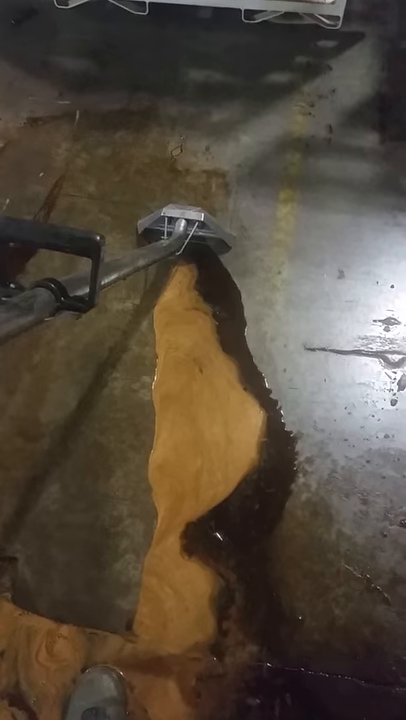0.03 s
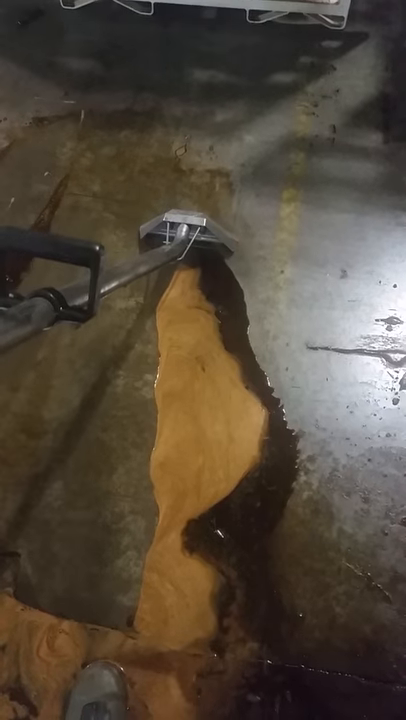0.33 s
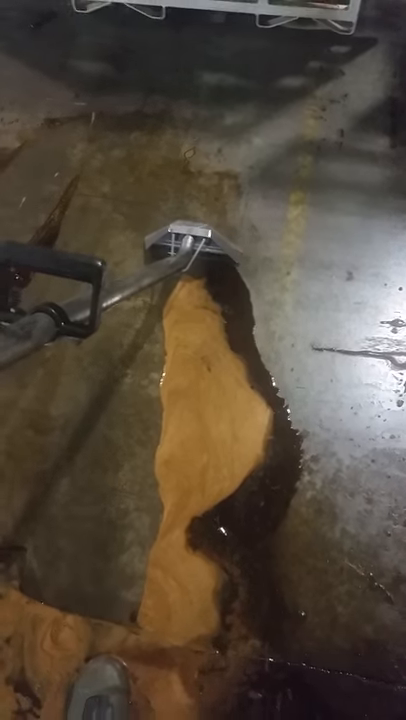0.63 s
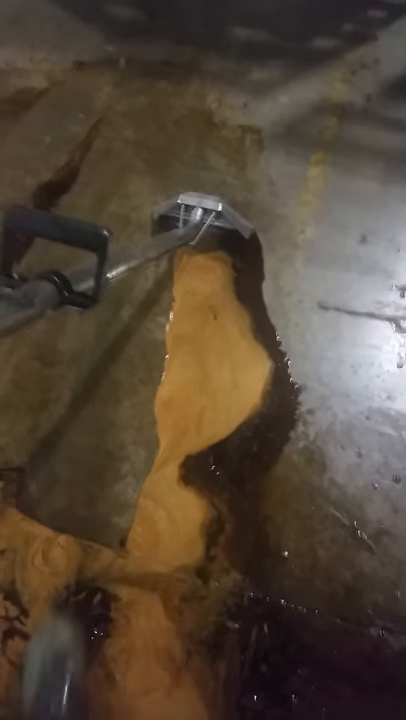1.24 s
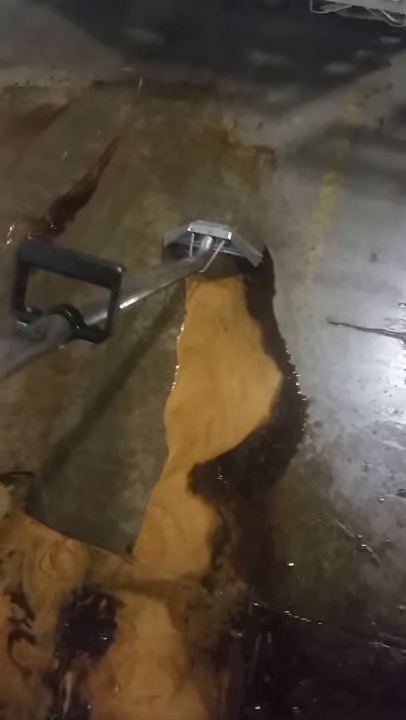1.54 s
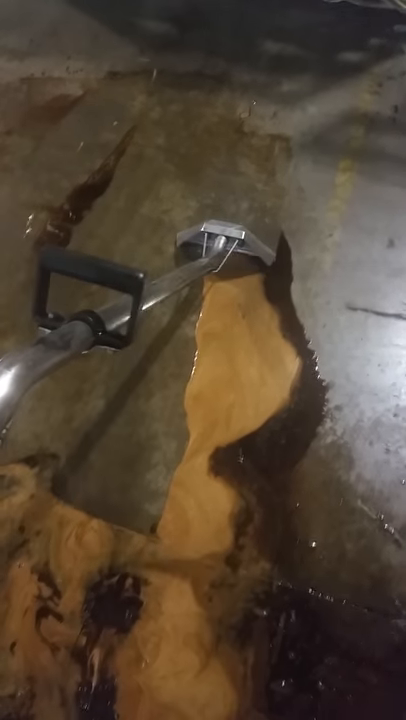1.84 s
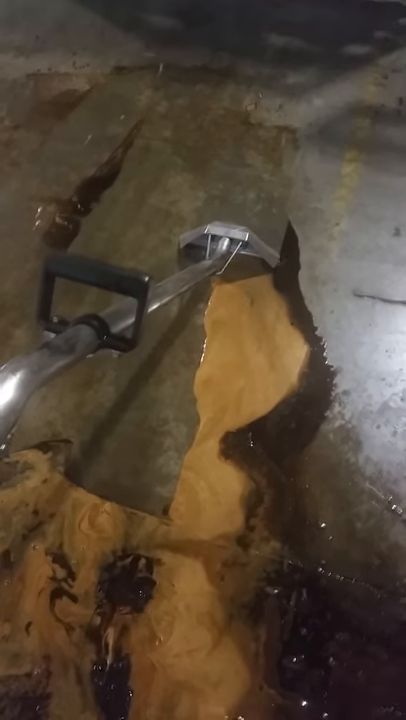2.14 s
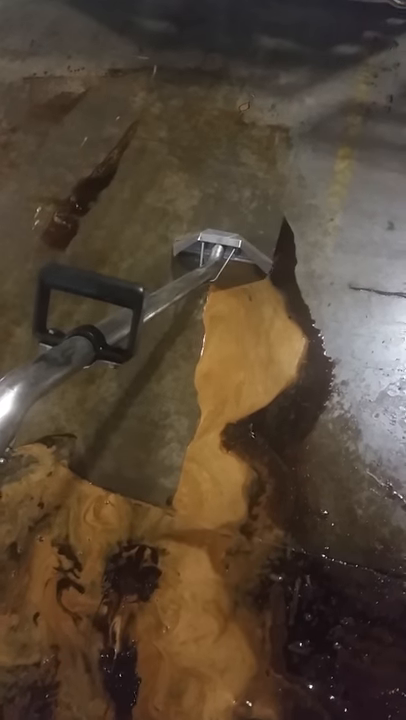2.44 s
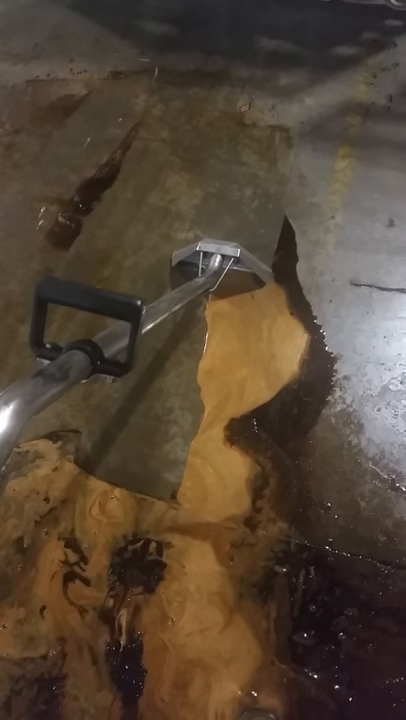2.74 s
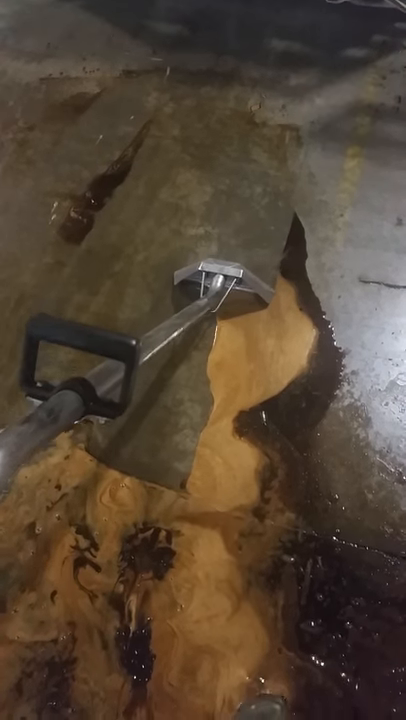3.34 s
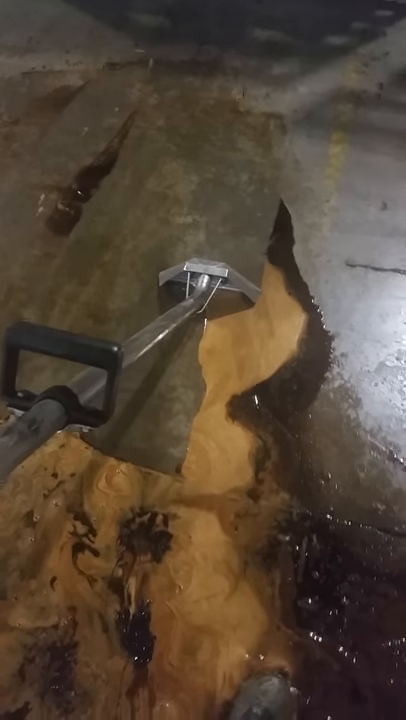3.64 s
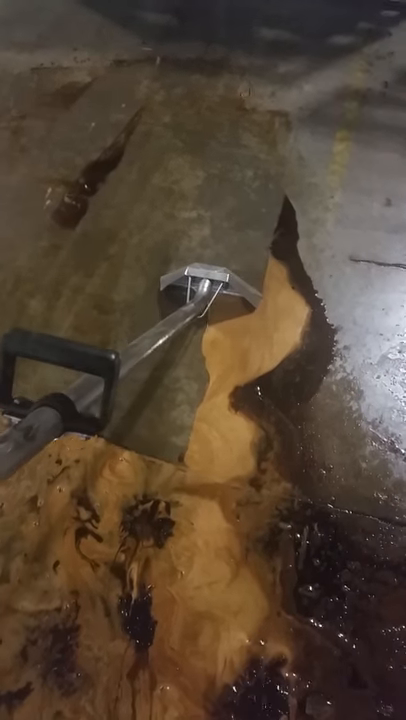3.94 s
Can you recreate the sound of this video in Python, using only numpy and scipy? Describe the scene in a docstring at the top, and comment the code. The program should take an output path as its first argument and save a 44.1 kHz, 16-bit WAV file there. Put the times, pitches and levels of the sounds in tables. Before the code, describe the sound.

Steady wet vacuum suction hisses over a machine's drone, with one brief whistle.

```python
"""A vacuum wand is drawn over a wet concrete floor in a warehouse: turbulent air rushes into the nozzle,
and water torn into spray hisses on the right. For a moment the nozzle seals on the floor, its tube
resonates and the gap whistles; water spits as it lets go, and later it half seals again. Behind it
an engine and its blower drone in harmonics over a rumble, with dull thumps and one brief throb.
The sound fades in from silence."""
import sys
import numpy as np
from scipy import signal
from scipy.fft import rfft, irfft, next_fast_len
from scipy.io import wavfile
from scipy.ndimage import uniform_filter1d, map_coordinates

SR = 44100
rng = np.random.default_rng(int(sys.argv[2]) if len(sys.argv) > 2 else 0)


def to_wav(sig):
    """Store sig (one row per channel, or 1-D mono) as 16-bit WAV at the path in sys.argv[1].

    Samples outside -1..1 are clipped; the rate is SR.
    """
    pcm = np.clip(np.atleast_2d(sig), -1, 1) * 32767
    pcm = np.round(pcm).astype(np.int16)
    wavfile.write(sys.argv[1], SR, pcm.T)  # frames by channels


N = 176400
TIME_S = np.arange(N) / SR


def amp(db):
    return 10 ** (np.asarray(db) / 20)


def unit_rms(x):
    return x / np.sqrt(np.mean(x ** 2) + 1e-20)


def over_frequency(rows, hz):
    """Each value column, interpolated on a logarithmic frequency axis."""
    row_hz, *columns = np.transpose(rows)
    return np.array([np.interp(np.log(hz + 1), np.log(row_hz + 1), column) for column in columns])


def over_time(rows):
    return np.interp(TIME_S, *np.transpose(rows))


def gate(start_s, end_s, attack_s, release_s):
    """A trapezoidal envelope whose release begins at end_s."""
    return np.clip((TIME_S - start_s) / attack_s, 0, 1) * np.clip(1 - (TIME_S - end_s) / release_s, 0, 1)


def pan(db):
    """Level difference between channels: positive is left."""
    return amp(np.array([[db], [-db]]) / 2)


def wobble(rate_hz):
    """Smooth random modulation through rate_hz knots a second."""
    return map_coordinates(rng.standard_normal(int(N * rate_hz / SR) + 4), [TIME_S * rate_hz])


def filtered(x, response):
    size = next_fast_len(N + SR // 2)
    return irfft(rfft(x, size) * response(np.fft.rfftfreq(size, 1 / SR)), size)[..., :N]


def band_pass(x, centre_hz, width_hz):
    return filtered(x, lambda hz: np.exp(-.5 * ((hz - centre_hz) / width_hz) ** 2))


def noise_band(centre_hz, width_hz):
    return unit_rms(band_pass(rng.standard_normal(N), centre_hz, width_hz))


def tone(hz, flutter, rate_hz):
    """A sinusoid with random amplitude and phase modulation."""
    phase = 2 * np.pi * (np.cumsum(hz * np.ones(N)) / SR + rng.random())
    in_phase = np.sin(phase) * (1 + flutter * wobble(rate_hz))
    quadrature = np.cos(phase) * flutter * wobble(rate_hz)
    return np.sqrt(2) * (in_phase + quadrature)


# Left-right likeness of the broadband noises: frequency_hz, correlation
COHERENCE = [(60, 0.43), (270, 0.79), (450, 0.43), (740, 0.4), (1220, 0.12), (2000, 0.1), (3300, 0)]
def stereo_noise(spectrum, patchy_db):
    """Partially coherent noise of rms 1, its spectrum modulated in drifting patches."""
    def mid_side_gains(hz):
        angle = np.arccos(over_frequency(COHERENCE, hz)[0]) / 2
        return np.array([np.cos(angle), np.sin(angle)])

    bins = signal.stft(rng.standard_normal((2, N)), nperseg=512)[2]
    patches = uniform_filter1d(rng.standard_normal(bins.shape[1:]), 8, axis=0)
    patches = unit_rms(uniform_filter1d(patches, 36, axis=1))
    pair = signal.istft(bins * amp(patchy_db * patches), nperseg=512)[1][:, :N]
    mid, side = filtered(pair, mid_side_gains)
    left_right = np.array([mid + side, mid - side])
    return unit_rms(filtered(left_right, lambda hz: amp(over_frequency(spectrum, hz))))


# Rumble spectrum: frequency_hz, relative_db
RUMBLE_SPECTRUM = [(10, -40), (28, -6), (40, -7), (56, -2), (72, -3.5), (110, -3), (170, -4), (240, -5),
                   (310, -9), (420, -17.5), (650, -31), (1500, -72)]
# Rumble envelope: time_s, level_db
RUMBLE_ENVELOPE = [(.8, -40), (1.15, -36), (1.5, -41.5), (1.9, -39.5), (2.3, -37.5), (2.7, -41), (4, -39.5)]
def rumble():
    """The machine fills the hall with low-frequency broadband noise."""
    return amp(over_time(RUMBLE_ENVELOPE)) * stereo_noise(RUMBLE_SPECTRUM, patchy_db=1.5)


# Engine speed: time_s, firing_hz
FIRING_RATE = [(.5, 109.1), (.85, 111.4), (1.5, 109.2), (2.25, 110.7), (2.52, 109), (3.3, 111.7),
               (4, 110.9)]
# Harmonics of the four-firing cycle: order, level_db
ENGINE_HARMONICS = [(1, -65), (2, -52), (3, -43.5), (4, -35.5), (5, -46.5), (6, -42.5), (7, -52), (8, -40),
                    (9, -48.5), (10, -52), (11, -57.5), (12, -55), (13, -56)]
def engine():
    """Periodic firing gives a harmonic series whose pitch follows the hunting speed."""
    cycle_hz = over_time(FIRING_RATE) / 4
    return sum(amp(db) * tone(order * cycle_hz, flutter=.1, rate_hz=7) for order, db in ENGINE_HARMONICS)


# Harmonics of the blower's rotation: order, level_db
BLOWER_HARMONICS = [(6, -38.5), (9, -45.5), (10, -42.5), (12, -44.5), (15, -50), (16, -50), (17, -54.5),
                    (18, -42.5), (20, -53), (21, -49)]
def blower(turn_hz=10.14):
    """Steady rotation radiates tones at multiples of the turning rate."""
    return sum(amp(db) * tone(order * turn_hz, flutter=.1, rate_hz=5.3) for order, db in BLOWER_HARMONICS)


def throb(drone, centre_hz=199, width_hz=38, lift_db=4, noise_db=-39):
    """One band of the drone swells briefly, and narrowband noise makes its amplitude fluctuate."""
    hum = (amp(lift_db) - 1) * band_pass(drone, centre_hz, width_hz)
    noise = amp(noise_db) * noise_band(centre_hz, width_hz)
    return (hum + noise) * gate(start_s=2.08, end_s=2.416, attack_s=.03, release_s=.03)


MACHINE_PAN_DB = 5
# Envelope of engine and blower: time_s, gain_db
DRONE_ENVELOPE = [(.8, -1.5), (1.7, -0.5), (2.25, 0), (2.5, -1.5), (2.8, .8), (4, 0.3)]
def machine():
    """Superposition: neighbouring partials of engine and blower beat above the rumble."""
    drone = amp(over_time(DRONE_ENVELOPE)) * (engine() + blower())
    return pan(MACHINE_PAN_DB) * (drone + throb(drone) + rumble())


# Low thumps: start_s, pitch_hz, level_db, t60_s
THUMP_EVENTS = [(1.258, 150, -27, .05), (2.074, 75, -19, .06), (2.084, 150, -12, .03)]
def thumps(low_cut_hz=49.7):
    """Damped oscillations make dull thumps, as of the hose jerking."""
    out = 0
    for start_s, pitch_hz, level_db, t60_s in THUMP_EVENTS:
        age_s = np.maximum(TIME_S - start_s, 0)
        out += amp(level_db - 60 * age_s / t60_s) * np.sin(2 * np.pi * pitch_hz * age_s)
    high_pass = signal.butter(2, low_cut_hz, "high", fs=SR, output="sos")
    return pan(MACHINE_PAN_DB) * signal.sosfilt(high_pass, out)


# Spits of water: start_s, centre_hz, width_hz, level_db, t60_s
SPIT_EVENTS = [(1.13, 520, 40, -37, .2), (1.255, 560, 140, -42, .12), (1.286, 13700, 1800, -24, .01)]
def spits(attack_s=.0015, pan_db=-11):
    """Water gulps and spits as the seal lets go: noise transients with exponential decay."""
    out = 0
    for start_s, centre_hz, width_hz, level_db, t60_s in SPIT_EVENTS:
        age_s = np.maximum(TIME_S - start_s, 0)
        envelope = np.minimum(age_s / attack_s, 1) * amp(level_db - 60 * age_s / t60_s)
        out += envelope * noise_band(centre_hz, width_hz)
    return pan(pan_db) * out


# Reverberation time of the warehouse: frequency_hz, t60_s
HALL_DECAY = [(200, 1.3), (1000, 1.37), (5000, 0.91), (15000, 0.2)]
def reverberation(x):
    """A diffuse field decays exponentially, fastest in the treble."""
    hz, age_s, bins = signal.stft(rng.standard_normal((2, SR)), SR, nperseg=256)
    decay = amp(-60 * age_s / over_frequency(HALL_DECAY, hz).T)
    tail = signal.istft(bins * decay, SR, nperseg=256)[1]
    return signal.fftconvolve(x[None], tail / np.linalg.norm(tail[0]), axes=1)[:, :N]


# Whistle partials: pitch_hz, level_db
WHISTLE_PARTIALS = [(842, -33.7), (1318, -54), (1637, -60), (2304, -58)]
# The whistle swells, then dips and briefly swells again as it rings away in the hall: time_s, gain_db
WHISTLE_ENVELOPE = [(.69, -30), (.74, -18), (.77, -11), (.8, -3), (.95, -.5), (1.08, 0), (1.15, 2.5),
                    (1.177, -7), (1.208, -1.5), (1.238, -16), (1.32, -24), (1.45, -45)]
def whistle(pan_db=3, wander_db=3, hall_db=-14):
    """Flow through the gap under the nozzle sustains a tone, which wanders sideways and reverberates."""
    bend = 1 + .002 * wobble(24.84)
    partials = sum(amp(db) * tone(hz * bend, flutter=.14, rate_hz=50) for hz, db in WHISTLE_PARTIALS)
    note = amp(over_time(WHISTLE_ENVELOPE)) * partials
    side_db = pan_db + wander_db * wobble(9.44)
    direct = note * amp(np.array([side_db, -side_db]) / 2)
    return direct + amp(hall_db) * reverberation(note)


# Fine spray spectrum: frequency_hz, left_db, right_db
FINE_SPRAY_SPECTRUM = [(9000, -60, -40), (11000, -40, -21), (12000, -26, -3), (13000, -34, -10),
                       (14500, -27, -4), (15500, -22, -3)]
def fine_spray(seal, level_db=-29):
    """Atomisation: the sealed nozzle tears the water finer, for a brighter hiss."""
    return amp(level_db + 1.8 * wobble(58)) * seal * stereo_noise(FINE_SPRAY_SPECTRUM, patchy_db=1.0)


# Spray spectrum: frequency_hz, left_db, right_db
SPRAY_SPECTRUM = [(6000, -74, -70), (7600, -52, -39), (8660, -36, -25), (10180, -36, -16.5),
                  (10530, -33, -14.5), (11950, -33, -7.0), (13000, -27, -4.0), (14350, -29, 1),
                  (15840, -23, -5)]
# Spray envelope: time_s, level_db
SPRAY_ENVELOPE = [(.72, -33), (.8, -28), (1.13, -27), (1.2, -35.5), (1.65, -35.5), (2.02, -35), (2.12, -31),
                  (2.25, -36), (2.45, -37.5), (2.68, -35.5), (2.82, -29.5), (2.9, -26), (3.04, -29),
                  (3.11, -31), (3.25, -32.5), (3.58, -28), (3.78, -28.5), (4, -29.5)]
def spray():
    """Water torn by the airflow radiates treble noise; fast amplitude modulation makes it sizzle."""
    sizzle_db = 0.51 * wobble(30) + 1.1 * wobble(830)
    return amp(over_time(SPRAY_ENVELOPE) + sizzle_db) * stereo_noise(SPRAY_SPECTRUM, patchy_db=1.57)


# Modes of the tube: centre_hz, width_hz, seal_db, half_seal_db, pan_db
TUBE_MODES = [(747, 55, -54.5, -52, 9), (2300, 105, -49.5, -49.5, 1.5), (3320, 68, -51, -61, -4),
              (4160, 260, -48.5, -51.5, 7.5), (4900, 120, -50.5, -59, 3)]
def tube_resonance(seal, half_seal):
    """Resonance: the air column rings in fluttering bands while the nozzle seals or half seals."""
    out = 0
    for centre_hz, width_hz, seal_db, half_seal_db, pan_db in TUBE_MODES:
        ring = np.array([noise_band(centre_hz, width_hz) for _ in range(2)]) * amp(2 * wobble(34.62))
        out += pan(pan_db) * ring * (amp(seal_db) * seal + amp(half_seal_db) * half_seal)
    return out


# Spectrum of the rush under seal: frequency_hz, left_db, right_db
SEALED_SPECTRUM = [(307, -33, -26), (520, -11, 1), (700, 2, -12), (1060, 4.5, 1), (1270, 3.5, -1),
                   (1830, -33, -22), (2300, -7, -9), (2750, -13, -8), (3320, -2, -13), (3640, -12, -7),
                   (4300, 4.5, -16), (4530, -2.5, -8), (4950, -5.5, -16), (5600, -26, -20),
                   (7200, -20, -18.5), (7850, -30.0, -23), (11000, -50, -50)]
def sealed_rush(seal, level_db=-39.5):
    """While the nozzle grips the floor, flow noise swells, filtered by the tube's resonances."""
    return amp(level_db + 1.5 * wobble(120)) * seal * stereo_noise(SEALED_SPECTRUM, patchy_db=2.2)


# Air rush spectrum: frequency_hz, left_db, right_db
AIR_SPECTRUM = [(200, -37, -31), (390, -3.5, -0.5), (525, -4.5, -3.0), (760, -0.5, -5), (960, -3.0, -6),
                (1120, -5.5, -8), (1700, -10.5, -6.5), (1910, -11.5, -7.5), (2190, -5.5, -6.5),
                (2820, -9.5, -10.0), (3720, -8, -13), (4280, -3.5, -13.5), (4860, -10.5, -31.5),
                (5070, -10.5, -13), (5770, -24.0, -31.5), (6870, -28.0, -22.5), (7700, -30.5, -31),
                (12000, -51, -52)]
# Air rush envelope: time_s, level_db
AIR_ENVELOPE = [(.7, -41), (1.25, -42.5), (1.7, -42.5), (2.15, -42.5), (2.55, -44), (2.8, -42.5),
                (2.92, -41), (3.05, -41.5), (3.16, -42), (3.8, -40.5), (4, -41.5)]
def air_rush():
    """Turbulence in the air entering the nozzle radiates broadband noise."""
    return amp(over_time(AIR_ENVELOPE) + 0.76 * wobble(25)) * stereo_noise(AIR_SPECTRUM, patchy_db=0.85)


def scene():
    """The pressures of machine and wand add linearly."""
    seal = gate(start_s=.72, end_s=1.136, attack_s=.058, release_s=.038)
    half_seal = gate(start_s=2.77, end_s=3.03, attack_s=.16, release_s=.09)
    background = machine() + thumps()
    suction = air_rush() + spray()
    grip = sealed_rush(seal) + tube_resonance(seal, half_seal) + fine_spray(seal) + whistle()
    return background + suction + grip + spits()


def record(dry):
    """The sound fades in from silence, and a steep low-pass filter limits its bandwidth."""
    start_s, fade_s, cutoff_hz = .37, .41, 15750
    fade = np.clip((TIME_S - start_s) / fade_s, 0, 1) ** 1.09
    return filtered(dry * fade, lambda hz: 1 / (1 + (hz / cutoff_hz) ** 400))


dry = scene()
out = record(dry)
to_wav(out)
```